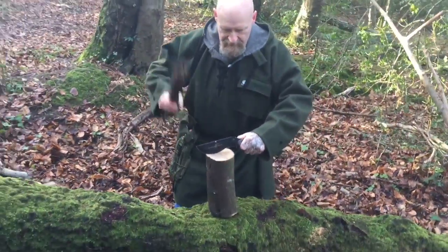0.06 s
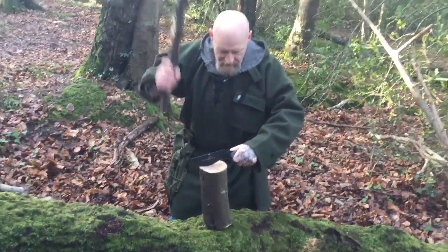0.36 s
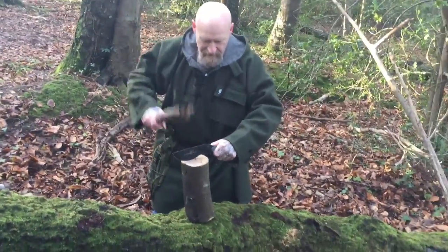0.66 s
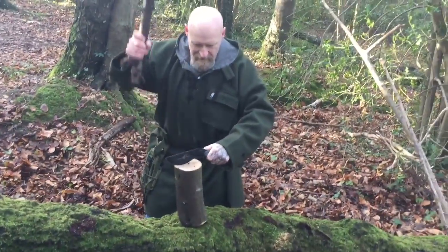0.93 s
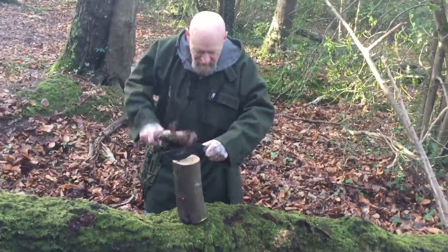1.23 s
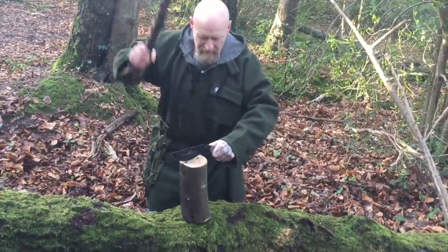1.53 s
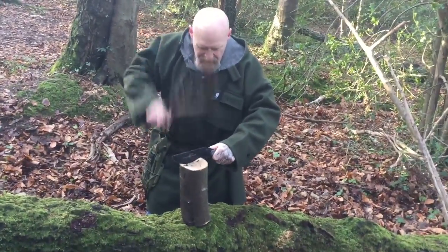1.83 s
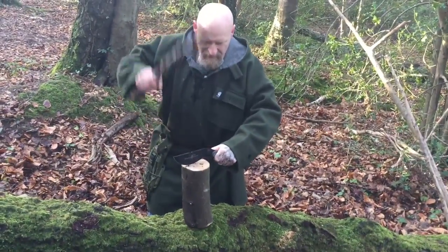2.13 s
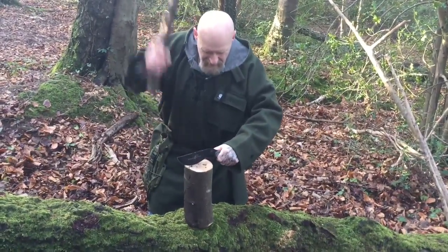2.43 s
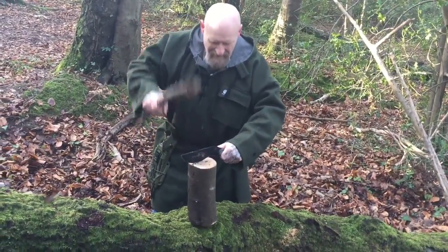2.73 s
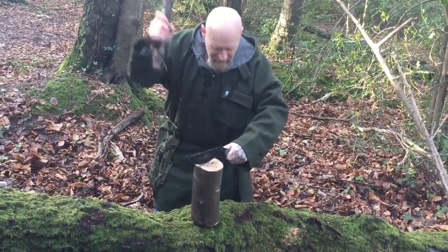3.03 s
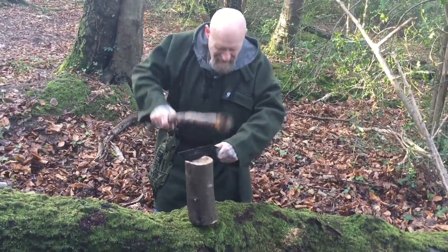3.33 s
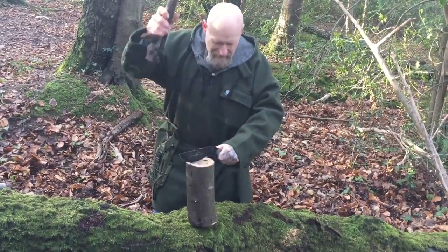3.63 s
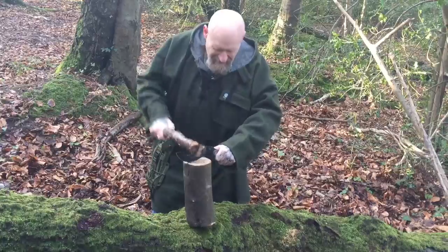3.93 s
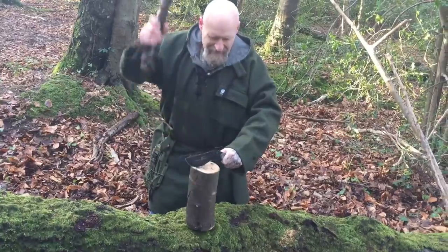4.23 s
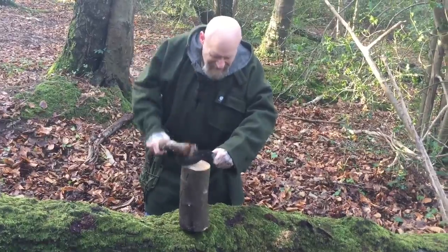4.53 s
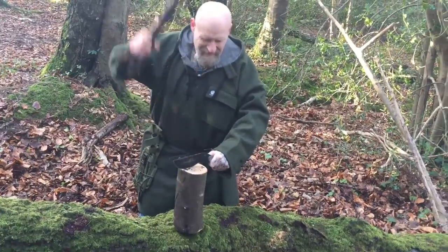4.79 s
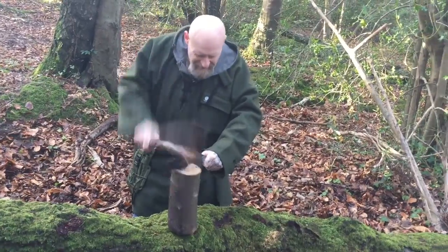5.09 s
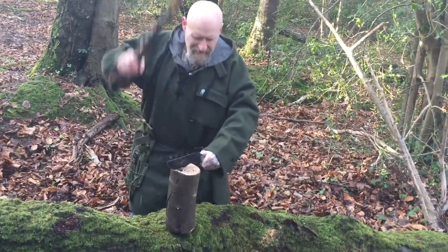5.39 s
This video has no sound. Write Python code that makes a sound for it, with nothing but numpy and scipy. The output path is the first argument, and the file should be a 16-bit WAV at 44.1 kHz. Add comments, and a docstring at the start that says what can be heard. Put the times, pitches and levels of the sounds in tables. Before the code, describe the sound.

A wooden baton knocks eight times on a knife blade splitting a log, with dry leaves crackling faintly in a quiet wood.

```python
"""A wood, one microphone close to a mossy trunk where a billet is being split, a soft rush far off.
A sleeve rustles, then a wooden baton knocks eight times on the spine of a knife stuck in the end grain.
Each blow rings baton, blade and billet, tears fibres and thumps the trunk; the trees scatter it back,
the billet hops and settles, and dry leaves tick. Midway a clump of leaves gives way with a crunch,
and after the last blow one more twig snaps."""
import sys
import numpy as np
from scipy import signal
from scipy.fft import rfft, irfft
from scipy.io import wavfile

SR = 44100
rng = np.random.default_rng(int(sys.argv[2]) if len(sys.argv) > 2 else 0)


def master_out(mix):
    """Clip the mix to full scale and print it as 16-bit PCM to the path in sys.argv[1]."""
    frames = np.transpose(np.atleast_2d(mix))
    ceiling = np.clip(frames, -1, 1)
    pcm = np.round(ceiling * 32767).astype(np.int16)
    wavfile.write(sys.argv[1], SR, pcm)


N = 249297
TIME = np.arange(N) / SR
HIT = TIME[:SR // 5]  # time axis of one short event

# Baton blows: start_s, force_db, hollow_db, mid_db, hard_db, blade_db, weight_db, halves_db, again_s
# (hollow to halves are relative to the force; again_s is the wait for the second contact)
BLOWS = [(0.5912, 0.44, -18, -25, 2.5, -6, -2.5, 8.5, 0.0029),
         (1.2978, 1.14, 4.5, -2.5, -7, -8, -1.5, 6, 0.0032),
         (1.9815, 1.5, -16, 6, 1.5, -2, -4, 8.5, 0.0032), (2.639, 5, 1, 0.5, -3.5, -5, -5.5, 5.5, .0031),
         (3.293, 0.5, 6.5, -3.5, 1, 2, -3, -7, 0.0026), (3.9670, 1.2, 4, -18, -9, -7, -5.5, -7, 0.0035),
         (4.6000, 4.46, 4.5, 3, -7, -12, -5.5, 9.5, 0.0028),
         (5.2277, 5.9, -16.5, -15, -6, -3.5, -4, 10, 0.003)]
# The billet's two halves flapping beside the blade: pitch_hz, level_db, t60_s
HALVES_MODES = [(234, -13.5, 0.033), (300.5, -19.5, .05)]


def undb(db):
    """Decibels to gain."""
    return 10 ** (np.asarray(db) / 20)


def unit(x):
    """Scale to rms 1."""
    return x / np.sqrt(np.mean(x ** 2))


def add(out, start_s, x):
    """Mix x into out from start_s on."""
    start = int(start_s * SR)
    out[start:start + len(x)] += x[:N - start]


def noise(spectrum, size):
    """Noise of rms 1, coloured by rows of frequency_hz, level_db."""
    hz, db = np.transpose(spectrum)
    bins_hz = np.maximum(np.fft.rfftfreq(size, 1 / SR), 1)
    gain = undb(np.interp(np.log(bins_hz), np.log(hz), db))
    return unit(irfft(rfft(rng.standard_normal(size)) * gain, size))


def fade(t, t60):
    """Silent before t = 0, then 60 dB down every t60 seconds."""
    return (t >= 0) * np.exp(-np.log(1000) * np.maximum(t, 0) / t60)


def ring(t, hz, t60):
    """One mode struck at t = 0."""
    return fade(t, t60) * np.sin(2 * np.pi * hz * t)


def walk(rate_hz):
    """Random values, rate_hz of them a second, joined by straight lines."""
    knots = rng.standard_normal(N // 8)
    return np.interp(TIME * rate_hz, np.arange(len(knots)), knots)


def burst(hz, octaves, skirt_db, t60):
    """A short crackle in a band around hz."""
    band = [(hz / 4 ** octaves, -30), (hz / 2 ** octaves, -8), (hz, 0),
            (hz * 2 ** octaves, -8), (hz * 8 ** octaves, skirt_db)]
    return noise(band, len(HIT)) * fade(HIT, t60)


def swells(rows):
    """Smooth rises and falls from rows of middle_s, length_s, level_db."""
    return sum(undb(db) * np.exp(-(2 * (TIME - s) / length_s) ** 2) for s, length_s, db in rows)


def batoning(knock_db=-15.0, tear_db=-9.5, thump_db=-8.0, trees_db=-34.5):
    """Every blow is a knock, a tearing crack and a thump, and the trees answer; all grow with force."""
    out = np.zeros(N)
    for start_s, force_db, *spot_db, weight_db, halves_db, again_s in BLOWS:
        blow = (undb(knock_db) * knock(spot_db, again_s)
                + undb(tear_db) * tear()
                + undb(weight_db + thump_db) * thump(halves_db))
        add(out, start_s, undb(force_db) * blow)
        add(out, start_s, undb(force_db + trees_db) * trees())
    return out


def knock(spot_db, again_s, again_db=-3, spread_s=0.00071):
    """The baton hits the spine, and again as the blade stalls; where it lands sets which modes speak."""
    # Baton, billet and blade ringing: pitch_hz, level_db, t60_s
    modes = [(685, -5.5, 0.031), (775, -7.5, .033), (961, -3, 0.037), (1120, -5, 0.018), (1210, 0.5, 0.042),
             (1372, 2, 0.027), (1470, 1.5, 0.02), (1578, -5, 0.035), (1880, -7.5, 0.018),
             (2230, -10.5, 0.017), (2294, 1.5, 0.019), (2553, -1, 0.032), (3227, -4, 0.029),
             (3760, -11, 0.021), (5040, -13.5, 0.032), (5415, -13, 0.034), (5950, -6.5, 0.023),
             (7200, -10, 0.016), (11400, -15.5, 0.018)]
    spot_hz = [710.0, 1023, 1340, 2300]  # hollow wood, mid wood, hard wood, blade
    out = 0
    for k, (hz, db, t60) in enumerate(modes):
        gain = undb(db + np.interp(np.log(hz), np.log(spot_hz), spot_db))
        hz = hz * (1 + 0.005 * rng.standard_normal())
        t = HIT - spread_s * np.sin((k + 1) ** 2) ** 2  # each mode reaches the air at its own moment
        out = out + gain * (ring(t, hz, t60) + undb(again_db) * ring(t - again_s, hz, t60))
    return out


def tear(rise_s=0.00064, hold_s=0.0027, t60=0.018, creak_db=-17, creak_t60=0.095, grain_db=2.5):
    """Fibres break in a dense crackle while the blade advances, and a few more as it stops."""
    # Tearing fibres: frequency_hz, level_db
    spectrum = [(200, -22), (500, -10.5), (750, -3), (1300, -1.5), (2400, -9.5), (3000, -11.5),
                (4000, -12.5), (4900, -17.5), (5700, -11.5), (8000, -17), (10300, -21), (11500, -19.5),
                (16000, -26.5)]
    grains = undb(grain_db * walk(2500)[:len(HIT)])
    advance = fade(np.maximum(HIT - hold_s, 0), t60) + undb(creak_db) * fade(HIT, creak_t60)
    advance *= 1 - np.exp(-HIT / rise_s)
    crackle = noise(spectrum, len(HIT)) * grains * advance
    return crackle * np.linalg.norm(advance) / np.linalg.norm(crackle)  # the advance sets the energy


def thump(halves_db, lag_s=0.0021, push_s=0.00542, release_db=-0.34):
    """The blade presses the billet into the trunk for a few milliseconds, then lets go."""
    # The billet rocking and bouncing on the trunk: pitch_hz, level_db, t60_s
    trunk_modes = [(126, -2.5, 0.052), (178.2, 0.5, 0.097)]
    halves = [(hz, db + halves_db, t60) for hz, db, t60 in HALVES_MODES]
    t = HIT - lag_s
    out = 0
    for k, (hz, db, t60) in enumerate(list(trunk_modes) + halves):
        press = ring(t, hz, t60)
        release = undb(release_db) * ring(t - push_s, hz, t60)
        out = out + (-1) ** k * undb(db) * (release - press)
    return out


def rebounds(contact_s=0.0045, settle_hz=130, settle_t60=0.043, flap_db=-7):
    """After a blow the billet lands softly on the moss, its halves flap, and the tools chatter."""
    # The billet dropping back on the trunk: start_s, level_db
    settles = [(0.647, -20), (1.356, -12.5), (2.031, -16), (2.692, -15.5), (3.345, -19), (4.020, -15),
               (4.664, -17.5), (5.306, -16)]
    # Baton and blade chattering against the wood: start_s, level_db, centre_hz
    chatters = [(0.6655, -31.5, 2680), (.7303, -39.5, 4270), (2.7203, -36.5, 5240), (2.7423, -39.5, 5800),
                (3.3663, -26, 1290), (4.6523, -30, 1290), (5.2839, -30, 1430)]
    flap_hz, _, flap_t60 = HALVES_MODES[0]
    flap = undb(flap_db) * ring(HIT, flap_hz, flap_t60)
    landing = np.minimum(HIT / contact_s, 1) * (ring(HIT, settle_hz, settle_t60) + flap)
    out = np.zeros(N)
    for start_s, db in settles:
        add(out, start_s, undb(db) * landing)
    for start_s, db, hz in chatters:
        add(out, start_s, undb(db) * burst(hz, octaves=0.85, skirt_db=-40, t60=0.016))
    return out


def trees(t60=0.32, build_s=0.0027, scatter_db=2.0):
    """Trunks and ground scatter a blow back to the microphone in a thin, uneven tail."""
    # Echo among the trees: frequency_hz, level_db
    spectrum = [(50, -10.5), (140, 15.5), (300, 10.5), (500, 2.5), (1000, -11.5), (1700, 2.5), (2700, -4.5),
                (4200, -2), (4850, -8.5), (5600, -6), (8500, -11), (10400, -16), (11500, -14.5),
                (16000, -23.5)]
    t = TIME[:SR]
    echoes = noise(spectrum, len(t)) * undb(scatter_db * walk(400)[:len(t)])
    return echoes * fade(t, t60) * (1 - np.exp(-t / build_s))


def twigs(ring_db=-10, ring_t60=0.028):
    """Twigs snap under the knees, each with its own brief ring."""
    # Twigs and dry leaves breaking: start_s, level_db, centre_hz
    snaps = [(0.981, -45.5, 6600), (1.07, -46.5, 7050), (1.2142, -44.5, 8900), (1.586, -42, 4050),
             (1.7765, -45.5, 5800), (2.1623, -46.5, 5500), (2.2368, -46.5, 6600), (2.8573, -45, 4330),
             (2.882, -43, 3900), (2.9048, -43, 6000), (2.9265, -42.5, 5030), (3.074, -48, 4860),
             (3.1162, -30.5, 5750), (3.1238, -30, 2680), (3.1474, -36, 7000), (3.8526, -47.5, 13000),
             (5.461, -36, 6300)]
    out = np.zeros(N)
    for start_s, db, hz in snaps:
        crack = burst(hz, octaves=1.03, skirt_db=-22, t60=0.011)
        add(out, start_s, undb(db) * (crack + undb(ring_db) * ring(HIT, hz, ring_t60)))
    return out


def rustle(rest_db=-72, patchy_db=2.0, crackle_db=4.0,
           crunch_s=3.117, crunch_db=-42, hold_s=0.032, release_t60=0.15):
    """Cloth and leaves rub in uneven catches: softly all along, more on a move, hard as leaves crush."""
    # Cloth and leaf friction: frequency_hz, level_db
    spectrum = [(700, -2), (1500, -1), (2700, 3.5), (4500, -11), (8500, -7), (10500, -14.5), (13000, -13.5),
                (16000, -19.5)]
    # Movements of sleeve and leaf litter: middle_s, length_s, level_db
    rubs = [(0.11, 0.36, -57), (0.39, 0.15, -54), (1.26, 0.1, -57), (1.44, 0.16, -56)]
    t = TIME - crunch_s  # a clump of dry leaves gives way
    crunch = undb(crunch_db) * (t >= 0) * fade(np.maximum(t - hold_s, 0), release_t60)
    catches = undb(patchy_db * walk(60) + crackle_db * walk(700))
    return noise(spectrum, N) * unit(catches) * (undb(rest_db) + swells(rubs) + crunch)


def leaves(shaken_db=-47, lag_s=0.07, stray_db=-56, stray_count=12,
           tick_hz=7500, spread_octaves=0.45, spread_db=3, cluster_s=0.06, cluster_size=3):
    """Dry leaves tick in small clusters: shaken just after each blow, and fainter now and then."""
    shaken = [(s + lag_s, shaken_db) for s, *_ in BLOWS]
    strays = [(s, stray_db) for s in rng.uniform(0, TIME[-1], stray_count)]
    out = np.zeros(N)
    for start_s, db in shaken + strays:
        for when, strength, pitch in rng.uniform(-1, 1, (cluster_size, 3)):
            tick = burst(tick_hz * 2 ** (spread_octaves * pitch), octaves=0.8, skirt_db=-24, t60=0.0088)
            tick_s = min(start_s + cluster_s * abs(when), TIME[-1])
            add(out, tick_s, undb(db + spread_db * strength) * tick)
    return out


def trunk_sway():
    """The trunk sways on the ground after the first blow, with a deep rumble."""
    # The rumble: frequency_hz, level_db
    spectrum = [(25, -29), (45, 4), (62, -1.5), (85, -14), (130, -12), (300, -84.5)]
    # Movements of the trunk: middle_s, length_s, level_db
    sways = [(0.76, 0.057, -33), (0.845, 0.08, -32)]
    return noise(spectrum, N) * swells(sways)


def air(level_db=-40.5, swell_db=-1.06, waver_db=2, low_hz=300):
    """A distant rush, whose low end wavers more than the rest."""
    # Open air in the wood: frequency_hz, level_db
    spectrum = [(15, -43.5), (25, -4), (59, 3), (80, 0.5), (102, -5), (161, 0), (335, -5.5), (463, -12),
                (1020, -7.5), (1700, -16.5), (3080, -33.5), (6920, -41), (10400, -50.5), (13200, -47),
                (16000, -60.5)]
    rush = noise(spectrum, N)
    low = signal.sosfiltfilt(signal.butter(2, low_hz, fs=SR, output="sos"), rush)
    swell = undb(level_db + swell_db * walk(1.768))
    waver = undb(waver_db * walk(9) - 0.87)
    return swell * (rush - low + low * waver)


def scene():
    """The trunk and the work close by, leaf litter around them and open air beyond, in mono."""
    return (trunk_sway() + batoning() + rebounds() + rustle() + twigs() + leaves() + air())[None]


def record(dry, low_hz=52, top_hz=15750):
    """The microphone sheds the deep bass; the recorder overloads on the knocks and cuts the top."""
    lean = signal.sosfilt(signal.butter(2, low_hz, "high", fs=SR, output="sos"), dry)
    clipped = lean / (1 + lean ** 8) ** (1 / 8)
    centred = signal.sosfilt(signal.butter(2, 30, "high", fs=SR, output="sos"), clipped)
    return signal.sosfilt(signal.ellip(8, 0.2, 70, top_hz, fs=SR, output="sos"), centred)


dry = scene()
out = record(dry)
master_out(out)
```